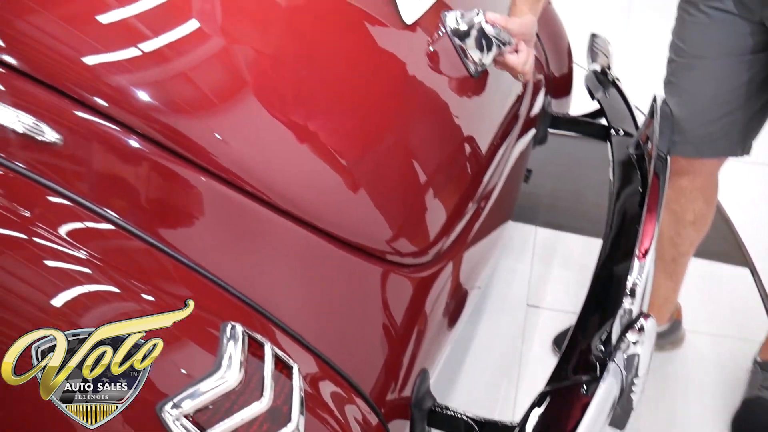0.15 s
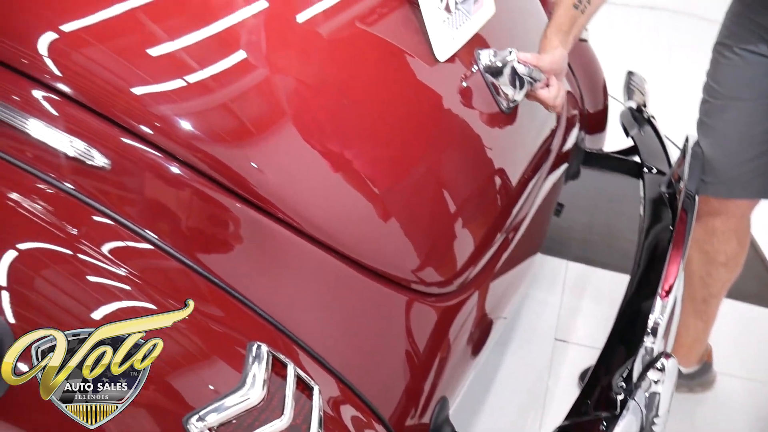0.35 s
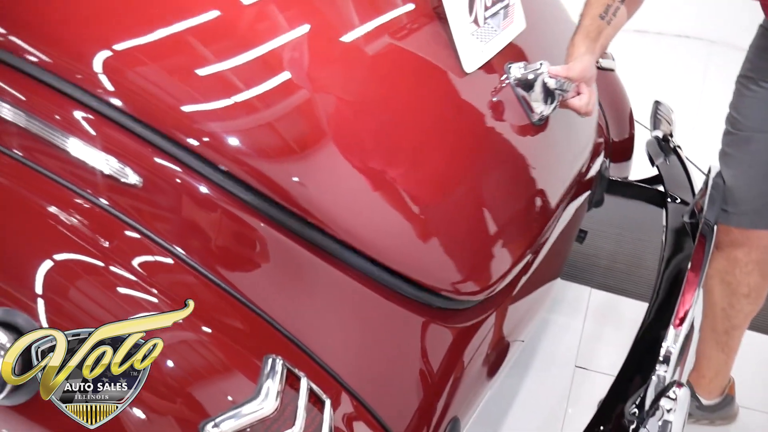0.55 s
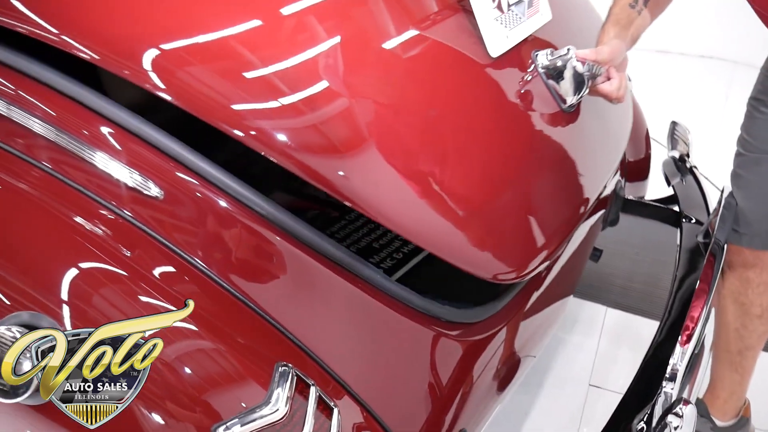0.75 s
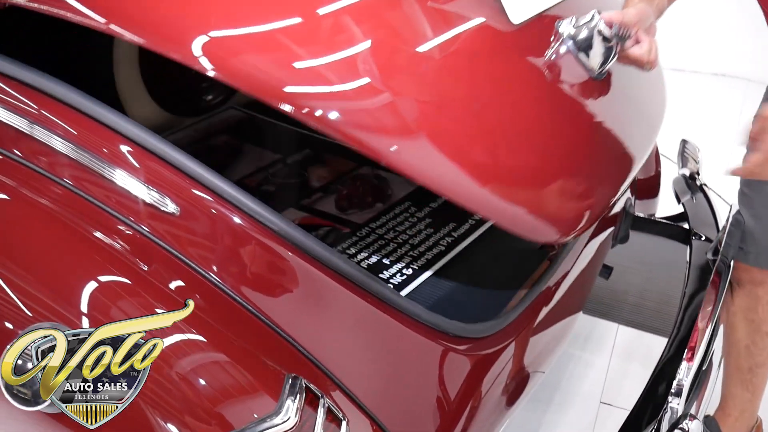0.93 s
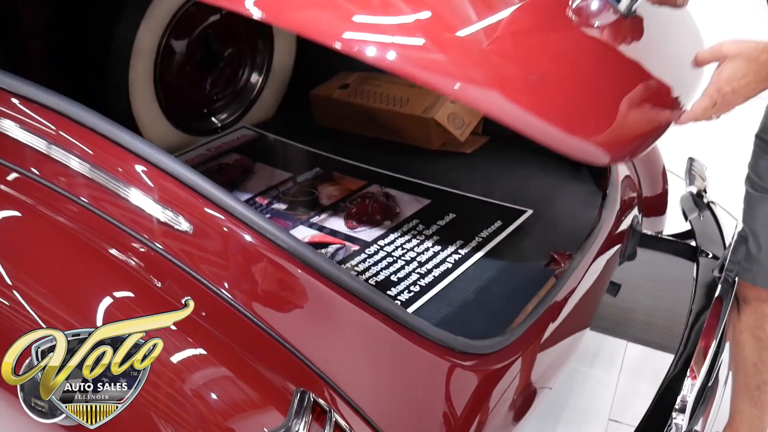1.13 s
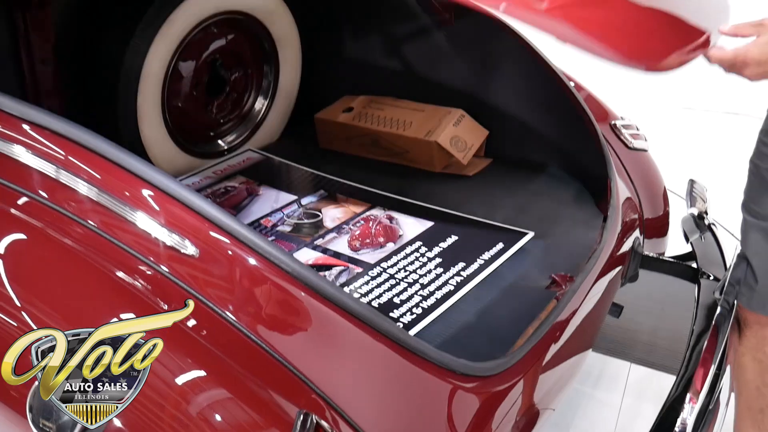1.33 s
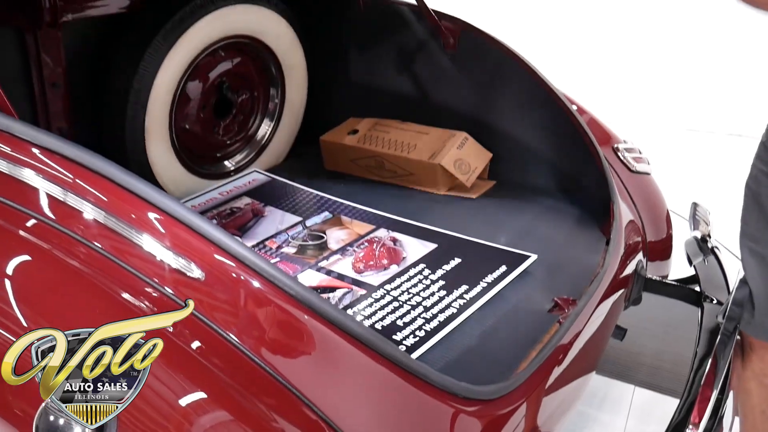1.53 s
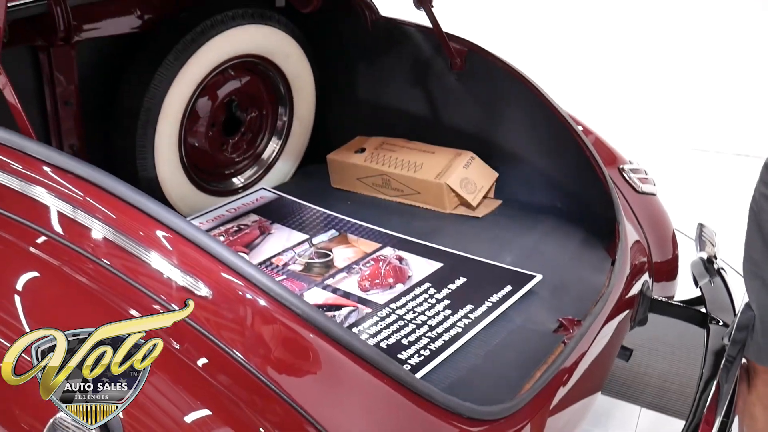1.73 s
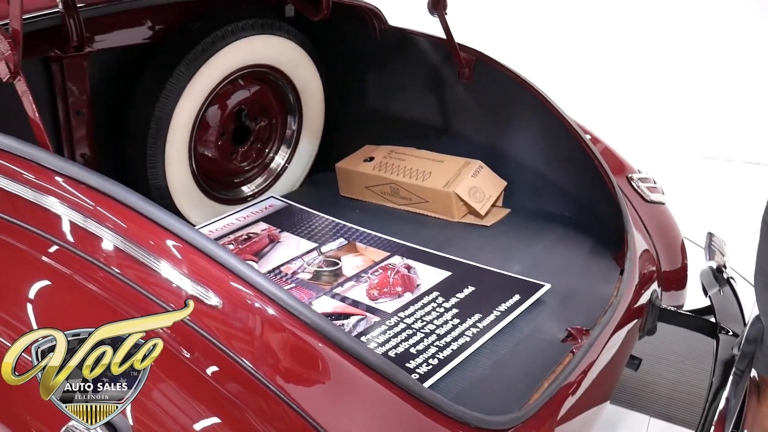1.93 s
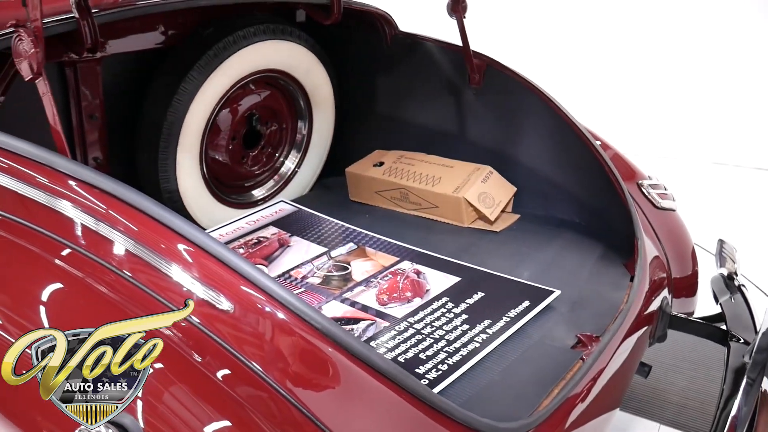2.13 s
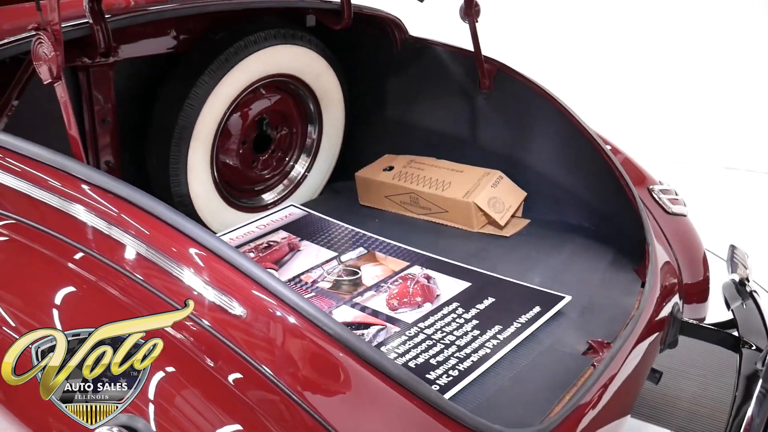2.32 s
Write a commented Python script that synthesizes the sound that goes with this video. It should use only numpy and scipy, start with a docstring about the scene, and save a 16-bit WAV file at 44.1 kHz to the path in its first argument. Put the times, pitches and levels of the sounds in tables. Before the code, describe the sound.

An old car trunk's hinges groan and creak as the lid rises, after a latch clunk.

```python
"""The sprung hinges of an old car's trunk stick and slip as the lid rises in a showroom: single jerks, then a dense
groan with gritty ticks. Uneven slips drive gliding resonances, most of them sinking, and dense metal ringing.
Before that the handle turns and the latch lets go with a clunk: decaying modes and shaped noise ring lid and steel.
The hall answers with a decaying noise tail; coloured noise makes the faint ventilation hum."""
import sys
import numpy as np
from scipy import signal
from scipy.fft import rfft, irfft, next_fast_len
from scipy.io import wavfile
from scipy.ndimage import uniform_filter1d

SR = 44100
rng = np.random.default_rng(int(sys.argv[2]) if len(sys.argv) > 2 else 0)


def unload_wav(signal):
    """Save mono or channel-first audio to the path in sys.argv[1] as 16-bit WAV at rate SR, clipped to [-1, 1]."""
    wavfile.write(
        sys.argv[1],
        SR,
        np.round(np.clip(np.atleast_2d(signal).T, -1, 1) * 32767).astype(np.int16),
    )


N = 104605
T = np.arange(N) / SR  # time in s

# spectrum of the hinged panel: frequency_hz, level_db (relative)
PANEL_SPECTRUM = [(30, -70.5), (90, -39), (160, -18), (230, 0.5), (360, 1), (480, 2), (570, -5.5),
                  (780, -1.5), (920, -14.5), (1300, -22.5), (2200, -34), (5000, -74.5), (12000, -120)]
# spectrum of the hinge grit: frequency_hz, level_db (relative)
GRIT_SPECTRUM = [(100, -45), (700, 4), (1700, 12.5), (2500, 7), (3600, 4.5), (6200, -1), (7200, -9.5),
                 (10000, -16), (15500, -30.5)]


def amp(db):
    """Decibel law: 20 dB is a factor of ten in amplitude."""
    return 10 ** (np.asarray(db) / 20)


def unit(x):
    """Normalization by effective value: the RMS becomes 1."""
    return x / np.sqrt(np.mean(x ** 2) + 1e-20)


def along(points, hz):
    """Logarithmic frequency scale: interpolate (frequency_hz, value) points along it."""
    f, v = np.transpose(points)
    return np.interp(np.log(hz + 1), np.log(f + 1), v)


def level(rows):
    """Amplitude envelope: gain per sample from (time_s, level_db) points, -120 dB before the first."""
    s, db = np.transpose(rows)
    return amp(np.interp(T, s, db, left=-120))


def colour(x, points, size=16384):
    """Minimum-phase filtering: folding the cepstrum makes a causal filter of the given spectrum."""
    log_gain = np.log(amp(along(points, np.fft.rfftfreq(size, 1 / SR))))
    cepstrum = irfft(log_gain)[:size // 2]
    cepstrum[1:] *= 2
    response = irfft(np.exp(rfft(cepstrum, size)))[:size // 2]
    return signal.fftconvolve(x, response)[:len(x)]


def tail(decay, size=256, count=SR // 2):
    """Diffuse decay: noise of total energy 1 whose frequencies each die at their own t60_s."""
    hz, t, z = signal.stft(rng.standard_normal(count), SR, nperseg=size)
    fading = z * amp(-60 * t / along(decay, hz)[:, None])
    y = signal.istft(fading, SR, nperseg=size)[1]
    return y / np.linalg.norm(y)


def add(track, s, sound):
    """Superposition: lay a sound into a track at time s."""
    part = track[round(s * SR):][:len(sound)]
    part += sound[:len(part)]


def knocks(rows, spectrum, decay, size=441, count=8192):
    """Impact on a body of high modal density: a noise-like ring for each (start_s, level_db) row."""
    out, hz = np.zeros(N), np.fft.rfftfreq(count, 1 / SR)
    for s, db in rows:
        add(out, s, amp(db) * tail(decay, count=count))
    # refer each level to the first moments of its blow
    power = np.average(amp(along(spectrum, hz)) ** 2, weights=along(decay, hz))
    return colour(out, spectrum) * np.sqrt(size / 2 / power)


def struck(modes, attack=0.009, count=SR // 2):
    """Modal superposition: one blow sets exponentially decaying sines ringing (attack in s)."""
    t = T[:count]
    out = np.zeros(count)
    for hz, db, t60 in modes:
        decay = np.exp(-np.log(1000) * t / t60)
        out += amp(db) * decay * np.sin(2 * np.pi * (hz * t + rng.random()))
    return out * (1 - np.exp(-t / attack))


def steady(x, size=5000):
    """Automatic gain: hold the slow level at 1 and keep the fast grain."""
    slow_power = uniform_filter1d(uniform_filter1d(x * x, size), size)
    return x / np.sqrt(np.abs(slow_power) + 1e-20)


def wobble(rate):
    """Random modulation: straight lines between random knots, rate knots a second."""
    knots = rng.standard_normal(100)
    return np.interp(T * rate, np.arange(len(knots)), knots)


def patchy(x, depth_db, size=512):
    """Time-frequency modulation: smoothed random patches of gain favour changing frequencies."""
    z = signal.stft(x, nperseg=size)[2]
    field = uniform_filter1d(rng.standard_normal(z.shape), size=6, axis=0)
    field = uniform_filter1d(field, size=6, axis=1)
    return unit(signal.istft(z * amp(depth_db * unit(field)), nperseg=size)[1][:N])


def ventilation():
    """Broadband flow noise: steady random noise with a bass-heavy spectrum."""
    # ventilation spectrum: frequency_hz, level_db (relative)
    air_spectrum = [(25, -12.5), (50, -8.5), (75, 3), (140, -1), (250, -2.5), (500, -4), (1000, -17),
                    (2000, -26), (5000, -39), (10000, -37.5), (16000, -50)]
    noise = rng.standard_normal(N + SR)
    # the first second is dropped, so the filter has settled
    return amp(-58) * unit(colour(noise, air_spectrum)[SR:])


def hall_answer(body, bright):
    """Reverberation: convolution with a diffuse tail that depends on frequency."""
    # hall reverberation: frequency_hz, t60_s
    hall_decay = [(100, 0.68), (500, 0.66), (2000, 0.48), (6000, 0.3), (14000, 0.42)]
    sent = amp(-13.5) * body + amp(-14) * bright
    return signal.fftconvolve(sent, tail(hall_decay, count=SR))[:N]


def handle_rub():
    """Sliding friction: coloured noise follows the soft rubbing of handle and seal."""
    # rubbing envelope: time_s, level_db
    rub_envelope = [(0, -71.5), (.13, -67.5), (.2, -68.5), (.35, -65.5), (.4, -67.5), (.45, -69.5),
                    (.55, -48.5), (.65, -59.5), (.74, -63), (.79, -74.5)]
    # rubbing spectrum: frequency_hz, level_db (relative)
    rub_spectrum = [(500, -10.5), (1300, 1), (3800, -2.5), (6000, -9), (10000, -26), (15500, -27)]
    return level(rub_envelope) * unit(colour(rng.standard_normal(N), rub_spectrum))


def snaps():
    """Short impacts: tiny sharp snaps of latch and hinge are brief treble bursts."""
    # snaps: start_s, level_db
    snap_rows = [(.539, -52), (.545, -56), (1.824, -52), (1.858, -55.5), (1.929, -53), (2.0, -53),
                 (2.068, -59), (2.101, -60.5)]
    # snap spectrum: frequency_hz, level_db (relative)
    snap_spectrum = [(2000, -8), (6000, 11), (10000, 3.5), (15500, -6)]
    return knocks(snap_rows, snap_spectrum, [(10000, .05)])


def latch_steel():
    """Impact of small stiff parts: clicks excite dense steel ringing and the modes of the bolt."""
    # latch clicks: start_s, level_db
    click_rows = [(0.1625, -36), (.174, -43.5), (.2325, -52.5), (0.302, -54.5), (0.373, -51.5),
                  (0.387, -57), (.393, -48.5), (.4426, -47), (0.4739, -21.5), (0.487, -36), (.497, -31),
                  (0.596, -43.5)]
    # steel spectrum: frequency_hz, level_db (relative)
    steel_spectrum = [(300, 10), (1000, 7.5), (2000, 1.5), (3000, 3), (3900, 8.5), (4700, 0.5), (5600, 0.5),
                      (7000, -5), (10000, -12), (15500, -20.5)]
    # steel ringing: frequency_hz, t60_s
    steel_decay = [(1000, 0.27), (4000, 0.07), (14000, 0.047)]
    # modes of the latch bolt: frequency_hz, level_db (relative), t60_s
    bolt_modes = [(940, 6.5, 0.085), (1046, 10, .05), (1734, -3.5, .06), (2395, -3, 0.17),
                  (2900, -7, 0.063), (3560, -9.5, 0.073), (3840, -3, 0.085), (4030, 1, 0.091),
                  (5360, -7, 0.11)]
    bolt_db = -18  # added to the level of each click
    out = knocks(click_rows, steel_spectrum, steel_decay)
    for s, db in click_rows:
        add(out, s, amp(db + bolt_db) * struck(bolt_modes, attack=0.00042, count=8192))
    return out


def latch_body():
    """Impulse excitation of a panel: the handle hits its stop, then the freed bolt thumps the lid."""
    # handle and latch blows on the lid: start_s, level_db
    blow_rows = [(.136, -44.5), (.148, -34), (0.1633, -21.5), (0.387, -40.5), (.444, -41), (.473, -6),
                 (.483, -14), (.497, -21)]
    # thud spectrum: frequency_hz, level_db (relative)
    thud_spectrum = [(25, -57), (90, -29), (130, -17), (170, 2.5), (330, 0.5), (520, -0.5), (800, -1.5),
                     (1050, -11.5), (1300, -33), (2000, -40.5), (5000, -56), (15000, -100)]
    # thud ringing: frequency_hz, t60_s
    thud_decay = [(80, 0.85), (170, 0.13), (350, 0.28), (700, 0.096), (2000, 0.05)]
    # modes rung by the handle: frequency_hz, level_db (relative), t60_s
    handle_modes = [(209, -6, 0.16), (305.4, 1, 0.3), (360, -2, 0.41), (371.3, 0, 0.41), (500, -6.5, 0.36),
                    (564, 5, 0.11), (633, -1, 0.13), (865, -22, 0.19), (1050, -22, 0.21), (3780, -26, .25),
                    (5650, -23, 0.16)]
    # modes of the lid: frequency_hz, level_db (relative), t60_s
    lid_modes = [(85.25, -23, 1.35), (130.5, -17, 0.25), (163.2, 0.5, 0.23), (201.5, 7, 0.45),
                 (296, -20, 0.2), (350, -10.5, .42), (383.5, -10, 0.14), (469, -2.5, 0.16), (515, 0, 0.22),
                 (556, -14, 0.23), (660, -4.5, 0.29), (689, 2.5, .24), (829, -5.5, .26), (885, -0.5, 0.27),
                 (1034, -18, 0.21), (1460, -30, .7)]
    handle_s, handle_db = .1635, -29.5
    release_s, release_db = .474, -23
    out = knocks(blow_rows, thud_spectrum, thud_decay)
    add(out, handle_s, amp(handle_db) * struck(handle_modes))
    add(out, release_s, amp(release_db) * struck(lid_modes, attack=0.012))
    return out


def pivot_ticks():
    """Modal excitation: each gritty tick rings the pivot steel in a different balance of modes."""
    # hinge ticks: start_s, level_db (relative)
    tick_rows = [(0.9615, -29.5), (1.0308, -38.5), (1.1968, -45), (1.278, -59.5), (1.5215, -50),
                 (1.6567, -36), (1.707, -32), (1.7396, -34), (1.7814, -35.5), (1.8195, -32),
                 (1.8543, -34.5), (1.927, -29), (1.9547, -34.5), (1.98, -37), (1.9964, -30.5),
                 (2.0375, -38), (2.079, -31), (2.0984, -38), (2.2807, -45.5)]
    # steel of the hinge pivots: frequency_hz, level_db (relative), t60_s
    pivot_modes = [(1460, 8.5, 0.12), (2052, 4.5, .25), (2280, -1.5, 0.3), (2620, 1, 0.13),
                   (2950, 2.5, 0.14), (3310, -0.5, .14), (3490, -10, 0.13), (4000, -2, 0.099),
                   (4690, -6.5, 0.22), (5220, -6, 0.28), (6200, -2, 0.085)]
    pivot_db, spread_db = -32, 7
    out = amp(-10) * knocks(tick_rows, GRIT_SPECTRUM, [(1500, 0.19), (5000, 0.16), (14000, .07)])
    for s, db in tick_rows:
        modes = [(hz, g + spread_db * rng.standard_normal(), t60) for hz, g, t60 in pivot_modes]
        add(out, s, amp(db + pivot_db) * struck(modes, attack=.001, count=6000))
    return out


def hinge_jerks():
    """Release of stored strain: each strong slip thuds the panel and rings the hinge modes."""
    # strong slips: start_s, thud_db (relative), ring_db
    slip_rows = [(.836, -37, -59.5), (.865, -29.5, -45), (.921, -25, -29), (.961, -18.5, -34.5),
                 (1.029, -22.5, -33), (1.088, -20.5, -32), (1.145, -21.5, -48.5), (1.159, -19, -33),
                 (1.22, -20.5, -36), (1.331, -16.5, -45.5), (1.401, -14.5, -28.5), (1.439, -18.5, -30.5),
                 (1.488, -10, -39), (1.715, -13.5, -49.5), (1.819, -12, -22.5), (1.865, -13, -37),
                 (2.026, -18, -48)]
    # modes rung by a jerk: frequency_hz, level_db (relative), t60_s
    jerk_modes = [(292, -10.5, .3), (359.2, -4.5, 0.23), (594, -4.5, 0.16), (617, -3, 0.16),
                  (804.8, -2.5, 0.11), (908, -2.5, 0.053), (1190, -19, 0.25)]
    thuds = [row[:2] for row in slip_rows]
    out = amp(-7) * knocks(thuds, PANEL_SPECTRUM, [(250, 0.28), (800, 0.29), (2000, 0.16)])
    for s, _, db in slip_rows:
        add(out, s, amp(db) * struck(jerk_modes, attack=.002, count=8192))
    return out


def slip_train():
    """Stick-slip friction: a train of unevenly spaced impulses of uneven size."""
    rate, scatter, spread_db = 85, .4, 3.5  # slips per s, share of a period, spread of sizes
    chance = rng.standard_normal((400, 2))
    s = (np.arange(len(chance)) + scatter * chance[:, 0]) / rate
    return np.bincount(np.abs(s * SR).astype(int), amp(spread_db * chance[:, 1]), N)[:N]


def rubbed(slips, spectrum, t60, rough):
    """Driven dense modes: slips share one ringing response, plus a rough part that keeps changing."""
    same = signal.fftconvolve(slips, tail([(1000, t60)]))[:N]
    power_decay = amp(-120 * T[:SR // 4] / t60)  # power falls to a millionth in t60
    energy = signal.fftconvolve(slips ** 2, power_decay)[:N]
    fresh = np.sqrt(np.abs(energy)) * rng.standard_normal(N)
    return steady(colour(unit(same) + rough * unit(fresh), spectrum))


def gliding(push, hz, t60, size=2000):
    """Driven resonance of moving pitch: shift to zero frequency, integrate with loss, shift back."""
    turn = np.exp(2j * np.pi * np.cumsum(hz) / SR)
    loss = np.exp(-np.log(1000) / (t60 * SR))
    ringing = signal.lfilter([1], [1, -loss], push * turn.conj())
    return steady((turn * ringing).imag, size)


def squeal(push):
    """Friction-driven resonance: a short, higher creak sags in pitch and fades."""
    # creak resonances: start_hz, level_db (relative)
    squeal_modes = [(1350, 0.5), (1440, -0.5), (1500, -14.5)]
    start_s, length_s, sag_hz_per_s = 1.655, 0.11, 500
    t = np.clip(T - start_s, 0, length_s)
    shape = (1 - np.exp(-t / 0.0031)) * np.sqrt(np.abs(1 - t / length_s))
    creak = sum(amp(db) * gliding(push, hz - sag_hz_per_s * t, t60=0.23) for hz, db in squeal_modes)
    return amp(-41) * shape * creak


def spring(push):
    """Time-varying resonance: modes swell and fade in turn as the lid rises, most sinking in pitch."""
    # hinge resonances: peak_pitch_hz (before wander), sag_hz_per_s, peak_s, half_length_s, level_db (relative)
    hinge_modes = [(192.2, 69, 1.72, 0.27, -8.5), (241.2, 8.5, 1.3, 0.22, -11), (229, 9.5, 2.162, 0.3, 2),
                   (313.6, 17, 1.1, 0.35, -4), (260.2, 37.5, 1.76, 0.14, -1.5), (381.5, 43, 1.64, 0.1, 1.5),
                   (345.6, 8, 2, 0.52, -5.5), (308.5, -4, 2.08, 0.24, -5), (493.6, 2.5, 1.75, 0.47, -8),
                   (601, 57.5, 1.5, 0.22, -12.5), (718.6, 38, 1.45, 0.19, -0.5),
                   (777, 128, 1.1, 0.16, -8.5), (768, 61.5, 1.8, 0.13, -6.5), (731, 55, 1.7, 0.12, -9.5),
                   (990, 349.5, 1.4, 0.2, -22), (1144, -4, 1.95, .25, -19), (1610, 453, 1.5, 0.18, -22.5)]
    wander_share, wander_rate = .012, 12  # pitch unsteadiness, random knots per s
    out = np.zeros(N)
    for hz, sag, s, half, db in hinge_modes:
        swell = 1 / (1 + np.square(np.square((T - s) / half)))
        pitch_hz = (hz - sag * (T - s)) * (1 + wander_share * wobble(wander_rate))
        out += amp(db) * swell * gliding(push, pitch_hz, t60=1)
    return signal.lfilter(*signal.butter(4, 150, "high", fs=SR), out)


def hinges():
    """Stick-slip excitation: one slip train drives the groaning body and the bright grit."""
    # envelopes of groan, rasp and grit (relative) and of boom: time_s, level_db
    groan_envelope = [(1.0, -52), (1.12, -34), (1.17, -26), (1.3, -29), (1.45, -30.5), (1.54, -26),
                      (1.62, -28.5), (1.74, -23.5), (1.84, -25), (1.93, -25), (2.03, -27), (2.2, -31.5),
                      (2.28, -39), (2.37, -57)]
    rasp_envelope = [(1.0, -46), (1.16, -45.5), (1.3, -51), (1.4, -44), (1.55, -33.5), (1.63, -40),
                     (1.69, -35.5), (1.85, -42), (2.02, -38.5), (2.1, -41.5), (2.2, -48.5), (2.3, -56),
                     (2.37, -81)]
    grit_envelope = [(1.0, -66.5), (1.17, -63), (1.33, -82.5), (1.45, -77), (1.55, -58), (1.62, -62.5),
                     (1.72, -57.5), (1.93, -48.5), (2.12, -61.5), (2.22, -59), (2.27, -69), (2.36, -89)]
    boom_envelope = [(.9, -56), (1.5, -70.5), (1.85, -65), (2.0, -41), (2.07, -34.5), (2.2, -41.5),
                     (2.37, -53.5)]
    # spectra of rasp and boom: frequency_hz, level_db (relative)
    rasp_spectrum = [(100, -68), (500, 4.5), (950, 1.5), (1400, -3.5), (1750, -12.5), (2300, -32),
                     (3500, -25.5), (12000, -82.5)]
    boom_spectrum = [(25, -40), (60, -9.5), (85, -9), (125, -9), (170, 0), (260, -5), (600, -61.5),
                     (3000, -120)]
    slips = slip_train()
    # a 1500 Hz low-pass softens the slips
    push = signal.lfilter(*signal.butter(2, 1500, fs=SR), slips - slips.mean())
    panel = rubbed(slips, PANEL_SPECTRUM, t60=.1, rough=0.45)
    groan = level(groan_envelope) * (amp(-5) * spring(push) + amp(-6) * panel)
    rasp = amp(-2) * level(rasp_envelope) * rubbed(slips, rasp_spectrum, t60=0.24, rough=0.76)
    boom = level(boom_envelope) * rubbed(slips, boom_spectrum, t60=0.85, rough=0.16)
    scrape = patchy(rubbed(slips, GRIT_SPECTRUM, t60=.08, rough=.2), depth_db=3.5)
    grit = amp(1) * level(grit_envelope) * scrape
    return groan + hinge_jerks() + rasp + boom + squeal(push), grit + pivot_ticks()


def scene():
    """Superposition of sources: latch, hinges, the hall's answer and its ventilation."""
    groan, grit = hinges()
    body = latch_body() + groan
    bright = latch_steel() + handle_rub() + grit + snaps()
    car_and_hall = body + bright + hall_answer(body, bright)
    # a 75 Hz high-pass keeps deep bass out of the car and hall sounds
    car_and_hall = signal.lfilter(*signal.butter(2, 75, "high", fs=SR), car_and_hall)
    return (car_and_hall + ventilation())[None]


def record(dry):
    """Linear filtering: a deep notch in the treble and a steep band limit, with smoothed edges."""
    notch_low_hz, notch_high_hz, top_hz = 7400, 9000, 15800
    m = next_fast_len(N + SR // 2)
    hz = np.fft.rfftfreq(m, 1 / SR)
    notch = np.where((hz > notch_low_hz) & (hz < notch_high_hz), .015, 1)
    passed = notch * (hz < top_hz)
    return irfft(rfft(dry, m) * uniform_filter1d(passed, size=300), m)[:, :N]


dry = scene()
out = record(dry)
unload_wav(out)
```